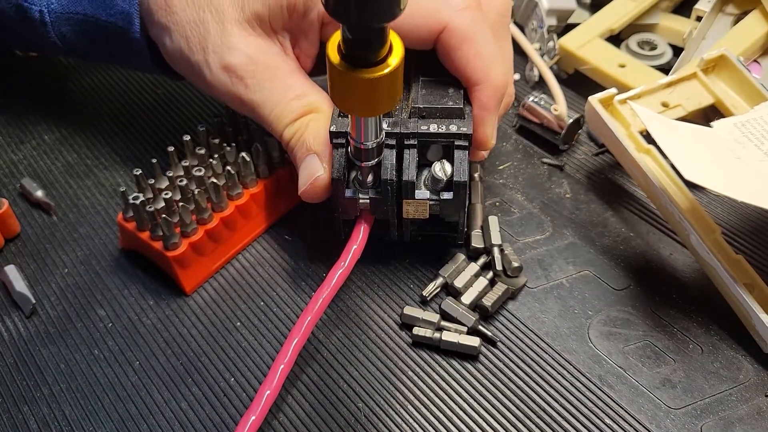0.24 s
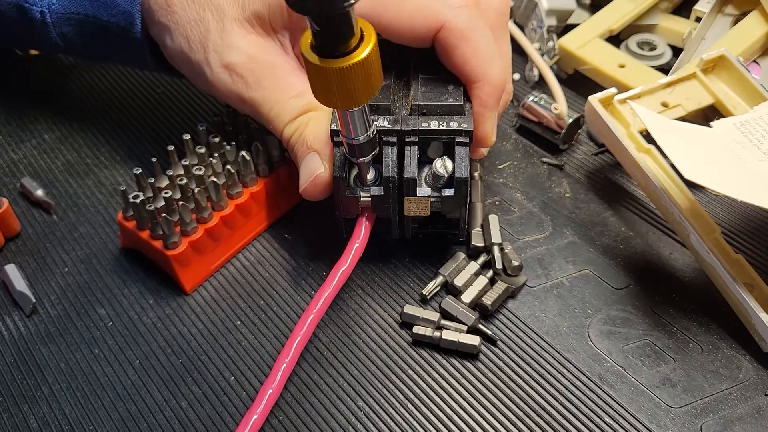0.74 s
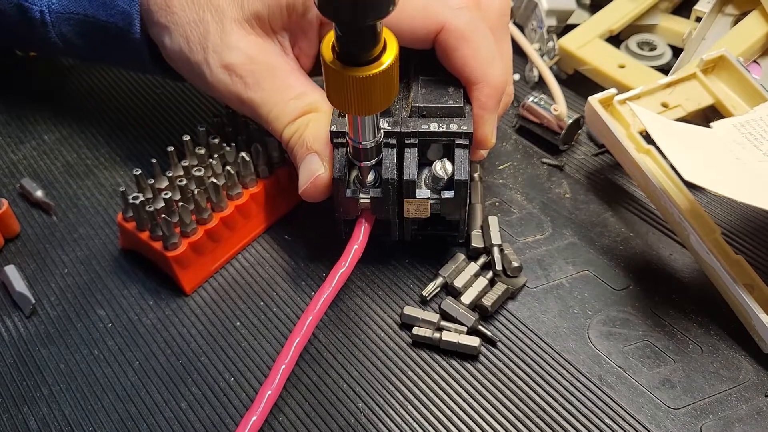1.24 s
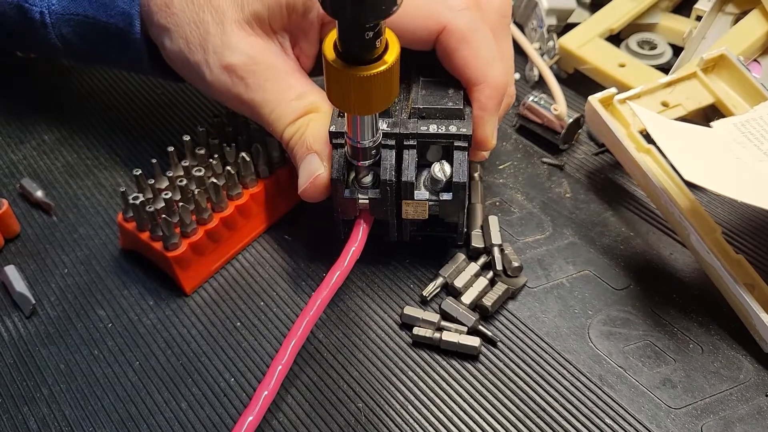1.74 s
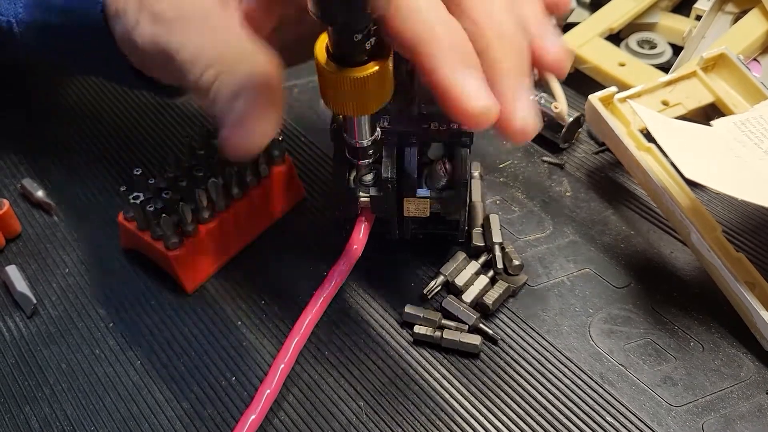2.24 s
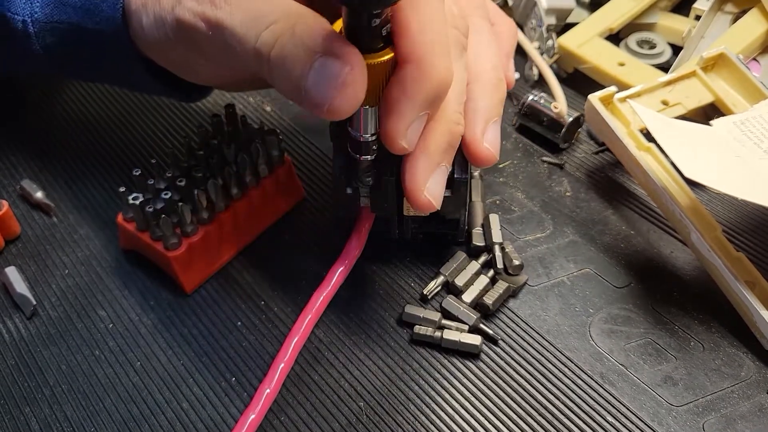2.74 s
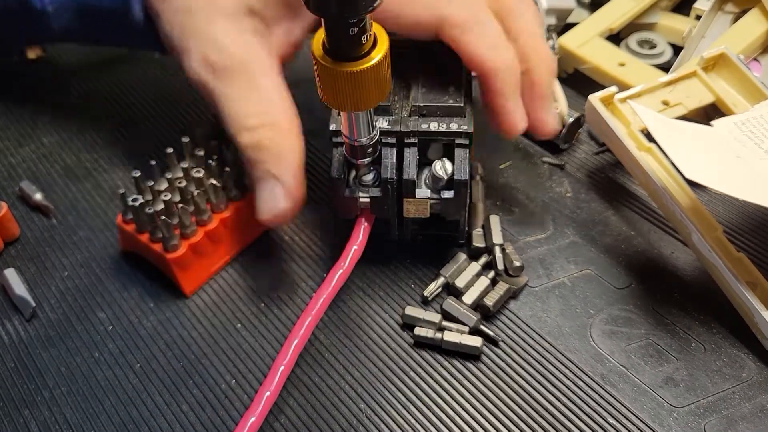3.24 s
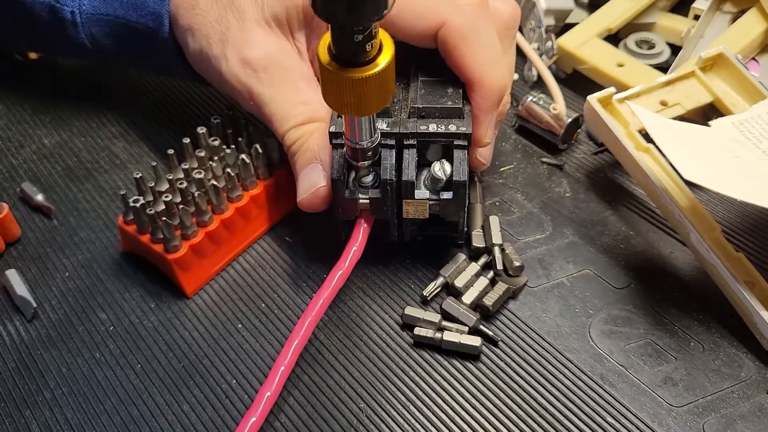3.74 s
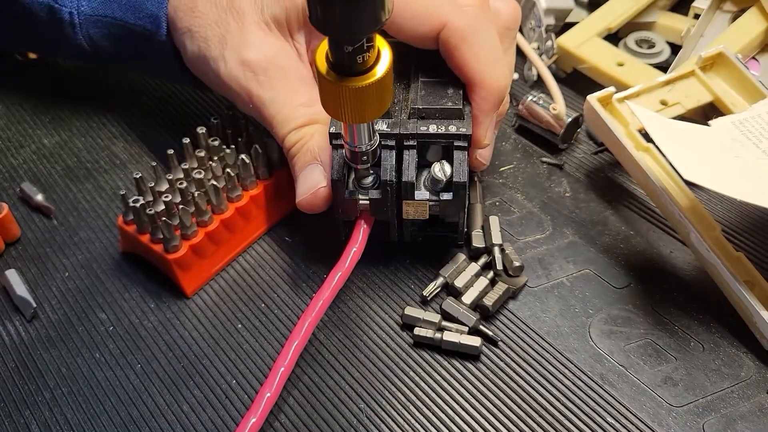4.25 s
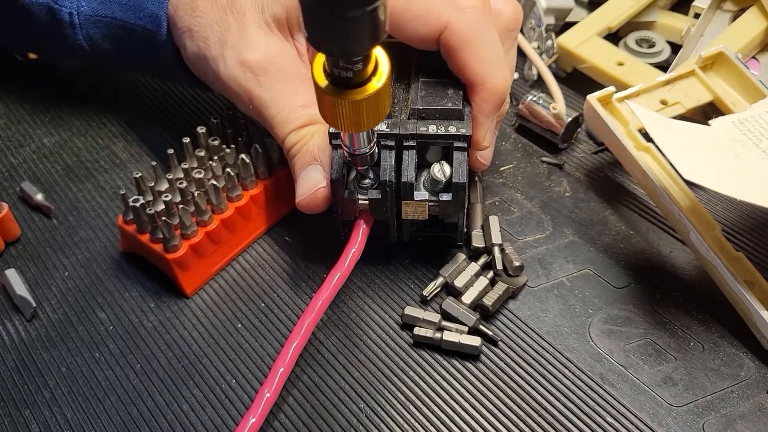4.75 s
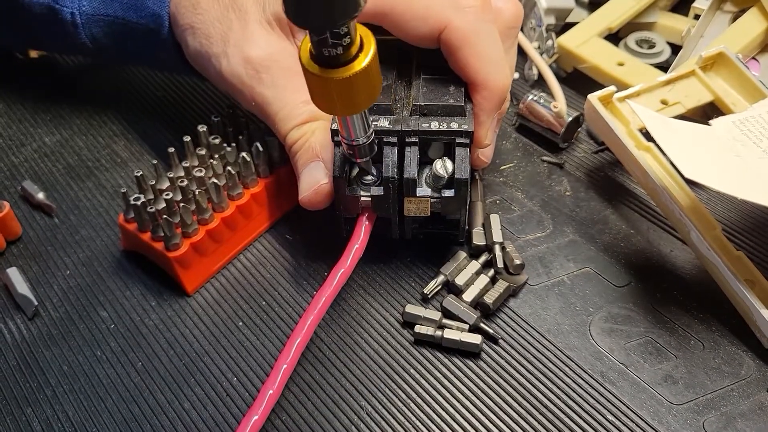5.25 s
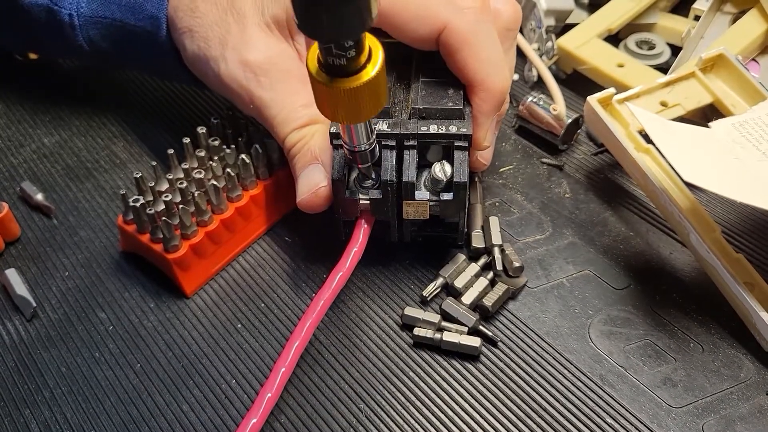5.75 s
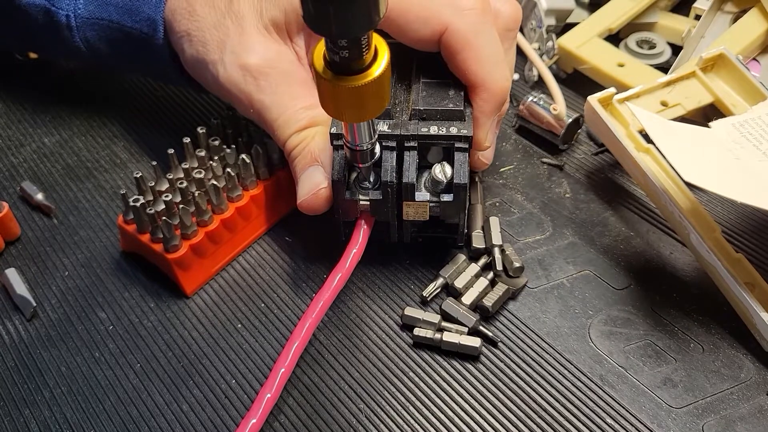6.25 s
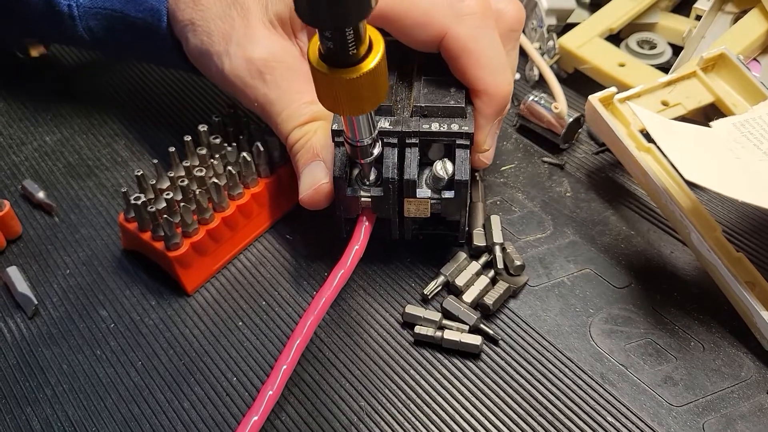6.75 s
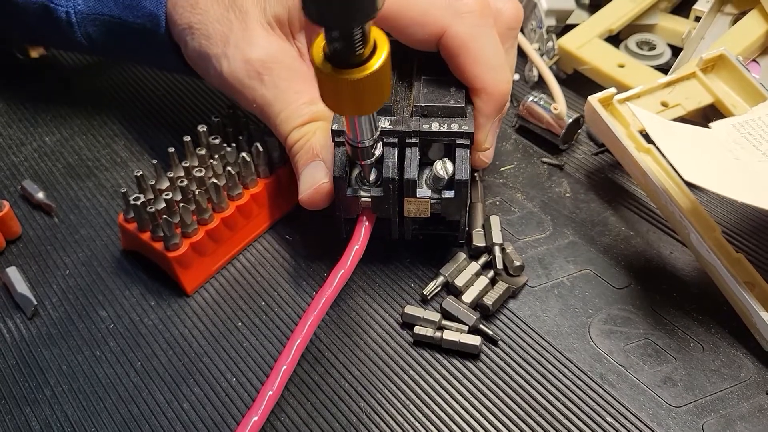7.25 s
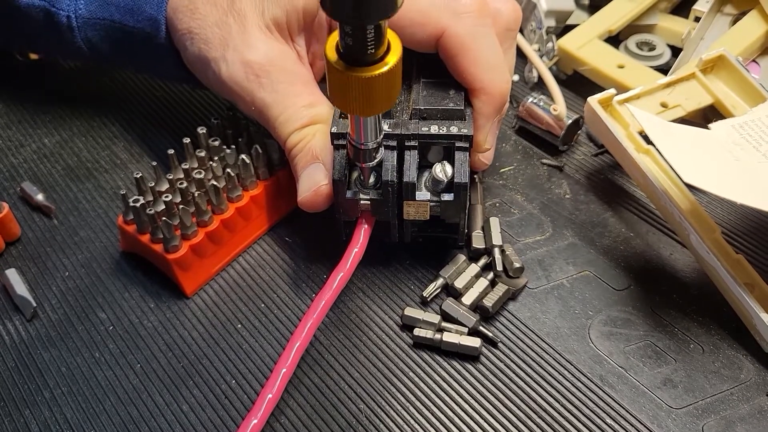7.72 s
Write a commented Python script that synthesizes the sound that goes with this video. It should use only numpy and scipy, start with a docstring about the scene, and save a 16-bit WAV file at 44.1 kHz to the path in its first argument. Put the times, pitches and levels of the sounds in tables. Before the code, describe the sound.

Close, uneven clicks and ticks of a steel bit slipping in a screw on a plastic breaker, mixed with short scrapes and soft booming bumps on a workbench. Two quick ratchet bursts come early, then a few metallic ticks and scattered clicks. A third burst lands with a heavier thump, and more clicks and another thump follow. The small workshop is quiet, with only a faint hiss and hum.

```python
"""A screwdriver bit clicks, slips and scrapes in the terminal screw of a plastic circuit breaker.
Each touch is a burst of tiny impacts that makes the plastic case and the steel bit ring briefly.
Every push and drop thumps the rubber-matted bench, which booms in a few low modes (the tones
an object rings at by itself). A quiet workshop hiss and a faint hum lie under it all."""
import sys
import numpy as np
from scipy import signal
from scipy.fft import rfft, irfft
from scipy.io import wavfile
from scipy.ndimage import uniform_filter1d

SR = 44100
rng = np.random.default_rng(int(sys.argv[2]) if len(sys.argv) > 2 else 0)


def log_audio(samples):
    """Write samples as a 16-bit WAV file to the path given in sys.argv[1]."""
    # one column per channel
    frames = np.atleast_2d(samples).T
    # limit to full scale, then quantise
    limited = np.clip(frames, -1, 1)
    pcm = np.round(limited * 32767).astype(np.int16)
    wavfile.write(sys.argv[1], SR, pcm)


N = 351918
T = np.arange(N) / SR


def gain(db):
    return 10 ** (np.asarray(db) / 20)


def at_level(x, db):
    return x * gain(db) / np.sqrt(np.mean(x ** 2))


def at_peak(x, db):
    return x * gain(db) / np.abs(x).max()


def bandpass(x, low_hz, high_hz):
    return signal.sosfilt(signal.butter(2, [low_hz, high_hz], "band", fs=SR, output="sos"), x)


def add(out, start_s, x):
    i = int(start_s * SR)
    out[i:i + len(x)] += x[:N - i]


def wander(rate_hz):
    """Glide between random values, mostly within -1 to 1."""
    step = int(SR / rate_hz)
    return 1.13 * uniform_filter1d(np.repeat(rng.standard_normal(N // step + 1), step), step)[:N]


def grit(count, spread_db):
    """Dense tiny impacts of very uneven size."""
    return rng.standard_normal(count) * gain(spread_db * rng.exponential(size=count))


def ring(force, modes, signs):
    """A force sets each mode ringing; it dies away by 60 dB in its fade time."""
    out = 0
    for (hz, db, fade_s), sign in zip(modes, signs):
        pole = np.exp(2j * np.pi * hz / SR - np.log(1000) / (fade_s * SR))
        out = out + sign * gain(db) * signal.lfilter([1], [1, -pole], force + 0j).imag
    return out


# how strong the hiss is from low to high: f/Hz, relative level/dB
HISS_SHAPE = [(110, -49), (180, -1.5), (248, -19.5), (478, -11), (535, -17.5), (994, -24), (2900, -23),
              (5000, -30.5), (6750, -29), (7550, -35.5), (11000, -40), (12100, -34.5), (13500, -36),
              (16000, -52.5)]
# steady hum tones: f/Hz, level/dB
HUM_TONES = [(464, -87), (351, -85)]
def workshop(hiss_db=-75.5):
    """A smooth hiss that drifts a little in loudness, and a faint hum."""
    hz = np.fft.rfftfreq(N, 1 / SR)
    shape_hz, shape_db = np.transpose(HISS_SHAPE)
    colour = gain(np.interp(np.log(hz + 1), np.log(shape_hz), shape_db, left=-60))
    hiss = at_level(irfft(rfft(rng.standard_normal(N)) * colour, N), hiss_db)
    hum = sum(gain(db) * np.sqrt(2) * np.sin(2 * np.pi * f * T) for f, db in HUM_TONES)
    return hiss * gain(1.1 * wander(1.224)) + hum


# tones of the bench top: f/Hz, relative level/dB, fade time/s
BENCH_MODES = [(66, -24.5, 0.028), (88.2, 2, 0.22), (124.6, 2, 0.26), (137, -3, 0.1), (149.4, 4.5, 0.18),
               (216.7, -12.5, 0.14), (290.2, -20, 0.15), (385.5, -14, 0.13)]
# which way each tone swings first: +1 or -1
BENCH_SIGNS = np.array([1, 1, 1, 1, -1, 1, -1, 1])
def bench_top(force):
    """The bench rings as a boom and a deep part; close, opposed modes swell and beat."""
    modes = np.array(BENCH_MODES)
    deep = modes[:, 0] < 100
    return [ring(force, modes[part], BENCH_SIGNS[part]) for part in (~deep, deep)]


# how much the bench trembles over time: t/s, level/dB
TREMBLE_LEVELS = [(0.0, -67.5), (0.49, -59.5), (0.66, -51), (1.07, -65), (2.02, -59.5), (2.27, -53.5),
                  (2.53, -58.5), (2.78, -48), (3.07, -61.5), (3.56, -53), (3.8, -62), (4.55, -66),
                  (5.36, -53.5), (5.78, -58), (5.89, -61), (6.11, -69.5), (6.96, -51.5), (7.29, -62),
                  (7.6, -52), (7.98, -69.5)]
def bench_tremble():
    """Hands keep the bench trembling between pushes."""
    boom, deep = bench_top(rng.standard_normal(N) * gain(3.05 * wander(16)))
    return at_level(boom + gain(3) * deep, np.interp(T, *np.transpose(TREMBLE_LEVELS)))


# pushes on the bench: t/s, boom level/dB, deep part above the boom/dB
PUSHES = [(0.118, -54, -17), (0.472, -45.5, -7), (0.564, -26.5, -7.5), (0.756, -39, -23),
          (1.106, -33.5, -29), (1.255, -50, -12), (2.149, -35, -5.5), (2.266, -39.5, -4),
          (2.337, -49.5, -19), (2.613, -42.5, -26), (2.684, -42, -5), (2.74, -38, -11), (2.79, -54, -27),
          (2.821, -40, -1), (2.87, -42, 6), (3.209, -37.5, -15), (3.373, -36.5, -25), (3.392, -32.5, -1),
          (5.141, -18, -14), (5.29, -37, -10), (5.395, -40.5, -6), (5.585, -28, -42), (6.285, -49.5, -1),
          (6.503, -42.5, -4), (6.751, -33.5, -18), (6.799, -35.5, -11), (7.535, -23.5, -8),
          (7.628, -41.5, -19), (7.675, -46.5, -22)]
def bench_thumps(push_s=0.0007, thud_s=0.046):
    """Each push rings the bench, and loose parts jump with a short, rough thud."""
    out, t = np.zeros(N), np.arange(20000) / SR
    boom, deep = bench_top(t * np.exp(-t / push_s))
    for s, db, deep_db in PUSHES:
        add(out, s - .004, at_peak(boom, db) + at_peak(deep, db + deep_db))
        rattle = rng.standard_normal(6000) * np.exp(-t[:6000] / thud_s)
        add(out, s, at_peak(bandpass(rattle, 190, 480), db - 19))
    return out


# tones of the breaker case and bit: f/Hz, relative level/dB
CASE_MODES = [(340, -2), (430, -3), (520, 2), (650, 1.5), (820, 1), (1000, -9), (1210, -7), (1600, -16.5),
              (1860, -5), (2120, -4), (2400, -11), (2780, -2.5), (3120, -6.5), (3500, -3.5), (3810, -5.5),
              (4260, -5), (4900, -1.5), (5700, 0), (6500, 3), (9000, -2)]
def contact(force, db, hz, knock_db, edge_db, focus_db=10, focus_octaves=0.25, crack_db=-3, far_db=5):
    """Case and bit give a click peaking at db; a low knock and a high steel edge are set relative to it."""
    mode_hz, mode_db = np.transpose(CASE_MODES)
    scatter, detune, swing = rng.standard_normal((3, len(mode_hz)))
    # where the force lands decides which modes speak: those near hz ring most
    octaves = np.abs(np.log2(mode_hz / hz))
    mode_db = mode_db + 2 * scatter + focus_db * np.exp(-(octaves / focus_octaves) ** 2) - far_db * octaves
    fade_s = .03 * (1000 / mode_hz) ** .8  # hand-held plastic dies fast, high tones fastest
    modes = np.c_[mode_hz * (1 + .015 * detune), mode_db, fade_s]
    part_of_mode = np.searchsorted([1500, 7500], mode_hz)
    centre_hz = max(hz, 2500)
    parts = [(db + knock_db, crack_db, (300, 1400)),
             (db, crack_db, (centre_hz / 1.764, centre_hz * 1.764)),
             (db + edge_db, crack_db + 20, (6500, 13500))]  # the steel edge is mostly dry crack
    out = 0
    for part, (part_db, part_crack_db, band_hz) in enumerate(parts):
        body = at_peak(ring(force, modes[part_of_mode == part], np.sign(swing)), 0)
        crack = at_peak(bandpass(force, *band_hz), part_crack_db)
        out = out + at_peak(body + crack, part_db)
    return out


def strike(out, s, db, hz, knock_db, edge_db, chatter_s, **tone):
    """Add one short chatter: the part creeps, snaps loose and rattles out."""
    t = np.arange(-600, 2600) / SR
    swell_and_fade = np.exp(np.where(t < 0, t / 0.33, -t) / max(chatter_s, .0003))
    snap = 1 + 1.73 * np.exp(-np.abs(t - .0007) / 0.0003)
    force = grit(len(t), spread_db=3.3) * swell_and_fade * snap
    add(out, s + t[0], contact(force, db, hz, knock_db, edge_db, **tone))


# rubbing strokes: t/s, length/s, level/dB, brightest f/Hz
STROKES = [(0.532, 0.061, -49.5, 2670), (0.766, 0.29, -52.5, 3400), (1.65, 0.076, -52, 2310),
           (1.74, 0.12, -35.5, 3020), (1.997, 0.12, -64.5, 4900), (2.115, 0.27, -46.5, 3780),
           (2.638, 0.27, -58, 4350), (2.838, 0.052, -45.5, 3160), (3.123, 0.21, -58, 2600),
           (3.239, 0.061, -51, 3870), (3.367, 0.1, -52, 3140), (3.573, 0.057, -51.5, 2650),
           (3.65, 0.19, -55.5, 2450), (4.381, 0.08, -61, 3080), (4.684, 0.13, -48.5, 2860),
           (5.283, 0.071, -47, 2940), (5.386, 0.081, -50.5, 3830), (5.557, 0.075, -50, 2430),
           (6.831, 0.091, -54, 2850), (6.93, 0.5, -58, 3030), (7.069, 0.11, -46.5, 3360),
           (7.169, 0.12, -48, 3940), (7.375, 0.04, -61.5, 4630)]
def scrapes():
    """Fingers, bit and mat rub in uneven slips; each stroke swells fast and eases off."""
    out, slips = np.zeros(N), gain(3.5 * wander(90))
    for s, length_s, db, hz in STROKES:
        progress = np.arange(int(length_s * SR) + 1000) / (length_s * SR)
        press = np.clip(np.minimum(progress / 0.17, 1.16 * (1 - progress)), 0, 1)
        force = grit(len(press), spread_db=3.53) * press * slips[int(s * SR):][:len(press)]
        knock_db = max(-24 * np.log2(hz / 2505), -18)  # duller strokes shake the case more
        add(out, s, contact(force, db, hz, knock_db, edge_db=-6.5, focus_octaves=0.35, crack_db=-4.5))
    return out


# dull knocks on the case: t/s, level/dB, f/Hz
CASE_KNOCKS = [(0.461, -49.5, 519), (1.104, -44, 737), (1.253, -59, 805), (2.573, -58.5, 816),
               (2.841, -57, 585), (3.007, -59, 826), (3.07, -59, 824), (3.37, -45.5, 390),
               (5.583, -44.5, 450), (6.283, -59, 496), (6.713, -44, 545), (6.798, -45.5, 780),
               (7.76, -57.5, 670)]
def case_knocks():
    """A knock mostly rings one low mode of the case, with a softer click on top."""
    out = np.zeros(N)
    for s, db, hz in CASE_KNOCKS:
        strike(out, s, db - 15, hz, knock_db=15, edge_db=-38, chatter_s=0.0096, focus_db=12.5, crack_db=-18)
    return out


# ticks inside the tool: t/s, level/dB, f/Hz
TOOL_TICKS = [(2.642, -37, 3950), (2.6736, -50.5, 4860), (2.7008, -58, 3930), (2.7295, -46, 4400),
              (2.738, -53, 4440), (2.7816, -57, 4340), (2.8125, -52.5, 4340), (5.209, -47, 2820)]
def metal_ticks():
    """Metal taps metal: one clear tone with little crack."""
    out = np.zeros(N)
    for tick in TOOL_TICKS:
        strike(out, *tick, knock_db=-31, edge_db=-15.5, chatter_s=0.0057,
               focus_db=16, crack_db=-6, far_db=22)
    return out


# the tone of the shaft: f/Hz, level/dB, fade time/s
SHAFT_MODE = (12200, -51.5, 0.047)
def shaft_ring(start_s=3.675):
    """The shaft rings once, thin and high."""
    out, t = np.zeros(N), np.arange(SR // 5) / SR
    hz, db, fade_s = SHAFT_MODE
    add(out, start_s, gain(db - 60 * t / fade_s) * np.sin(2 * np.pi * hz * t))
    return out


# runs of clutch teeth: first t/s, last t/s, tooth count, first level/dB, last level/dB,
# first f/Hz, last f/Hz, relative knock/dB, relative edge/dB
CLUTCH_RUNS = [(0.7006, 0.7572, 5, -30, -32.5, 2050, 2900, -10.5, -26),
               (1.7571, 1.82, 5, -35.5, -41.5, 3700, 2830, -5, -25),
               (5.141, 5.1648, 3, -30, -32, 2100, 4000, -6.5, -44)]
def clutch_slips():
    """The clutch slips over a few teeth, each clicking at a new pitch and strength."""
    out = np.zeros(N)
    for first_s, last_s, teeth, first_db, last_db, first_hz, last_hz, knock_db, edge_db in CLUTCH_RUNS:
        for progress in np.linspace(0, 1, round(teeth)):
            s = first_s + progress * (last_s - first_s)
            db = first_db + progress * (last_db - first_db) + 1.5 * rng.standard_normal()
            hz = first_hz * (last_hz / first_hz) ** progress
            strike(out, s, db, hz, knock_db, edge_db, chatter_s=0.0085)
    return out


# single clicks of the bit: t/s, level/dB, brightest f/Hz, relative knock/dB, relative edge/dB
BIT_CLICKS = [(0.2037, -56.5, 1800, -7, -33), (0.3724, -34.5, 2900, -14, -31), (0.5576, -33, 2000, -3, -35),
              (0.5858, -43, 5730, -21, -20), (1.509, -46.5, 2800, -10.5, -28),
              (1.6839, -46.5, 2300, 6.5, -22), (2.1251, -45.5, 3370, -12, -9),
              (2.1803, -56.5, 3000, -29, 8.5), (2.218, -50, 2850, -25, -27),
              (2.2467, -37.5, 2900, -24, -23), (2.2574, -38, 3830, -22, -22),
              (2.5633, -55.5, 2700, -6, -33), (2.8565, -39.5, 4000, -14.5, -44),
              (3.5791, -40, 2600, -17, -43), (3.6745, -35, 2860, -12.5, -17), (3.687, -34, 3120, -4.5, -15),
              (3.8059, -51, 3130, -5.5, 8), (4.6017, -55, 2630, -2, -10), (4.7141, -41.5, 2860, -20, -38),
              (4.8005, -34, 2870, -13, -9), (4.8749, -40.5, 2600, -10, -8), (4.998, -61.5, 2110, -6, -28),
              (5.0708, -49.5, 2100, -20, -10), (5.0842, -42.5, 2320, -4.5, -33),
              (5.1289, -44.5, 2120, 5.5, -26), (5.286, -45, 2820, -12, -30), (5.335, -46, 2880, -12, -35),
              (5.8905, -59.5, 3150, -1.5, 5), (6.0222, -57.5, 3040, -3, 10), (6.4546, -41, 2060, -1.5, -8),
              (6.5334, -54.5, 3060, 1.5, 7), (6.7752, -41, 2630, -1, -22), (6.8728, -65.5, 3190, -6, 14),
              (6.9498, -50, 2900, -12, -10), (6.976, -46, 3140, -36, -16), (7.0324, -57, 2160, 2.5, 12.5),
              (7.1287, -44.5, 3030, -29, -8), (7.2489, -46, 2950, -11.5, -13),
              (7.5291, -32.5, 2930, -3, -18), (7.9057, -56.5, 2800, -10.5, -13)]
def bit_clicks():
    """The bit strikes the breaker; some clicks snap clean, some rattle a little longer."""
    out = np.zeros(N)
    for click in BIT_CLICKS:
        strike(out, *click, chatter_s=0.0083 * gain(1.4 * rng.standard_normal()))
    return out


def room_echo(sound, echo_db=-16, fade_s=.18):
    """The room answers with a short, dull echo."""
    t = np.arange(SR // 2) / SR
    dull_noise = signal.lfilter([1], [1, -.6], rng.standard_normal(len(t)))
    tail = dull_noise * gain(-60 * t / fade_s) * (t > .003)
    return gain(echo_db) * signal.fftconvolve(sound, tail / np.sqrt(np.sum(tail ** 2)))[:N]


def scene():
    """Mix the tool, its echo, the bench and the workshop into one channel."""
    tool = bit_clicks() + clutch_slips() + shaft_ring() + metal_ticks() + case_knocks() + scrapes()
    return (tool + room_echo(tool) + bench_thumps() + bench_tremble() + workshop())[None]


def record(dry, low_hz=74, top_hz=15900):
    """Steeply cut the deepest bass and the highest treble."""
    trimmed = signal.sosfilt(signal.butter(5, low_hz, "high", fs=SR, output="sos"), dry)
    return signal.sosfilt(signal.ellip(10, .2, 60, top_hz, fs=SR, output="sos"), trimmed)


dry = scene()
out = record(dry)
log_audio(out)
```